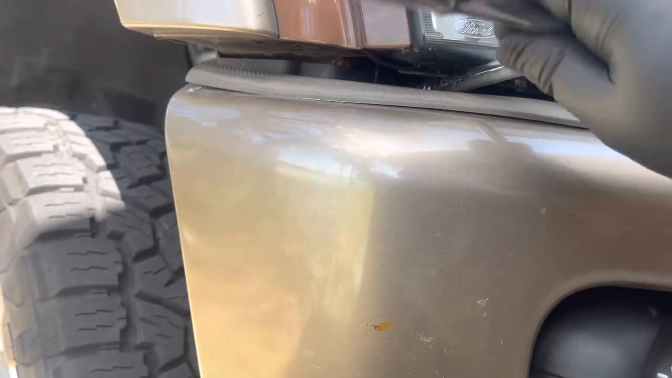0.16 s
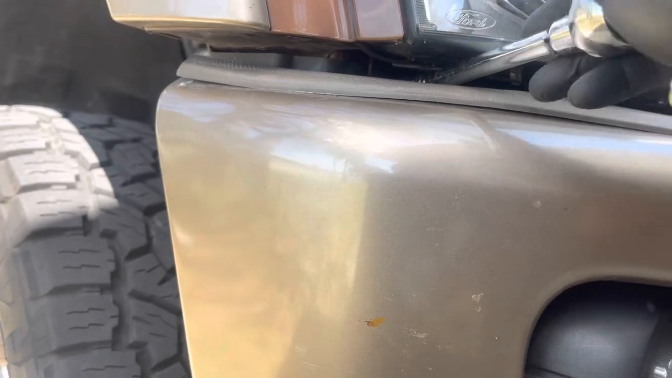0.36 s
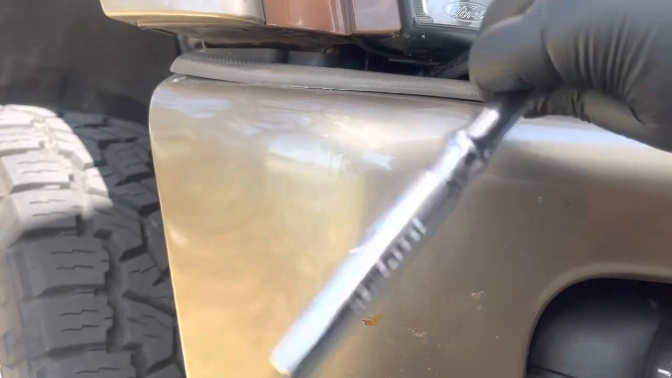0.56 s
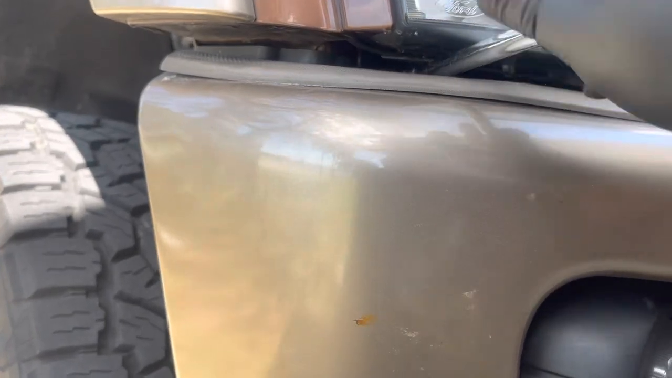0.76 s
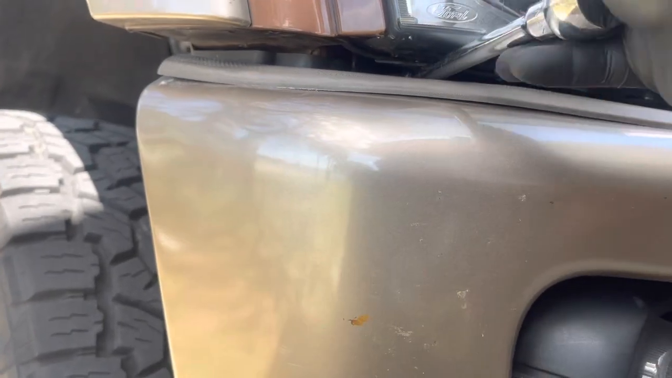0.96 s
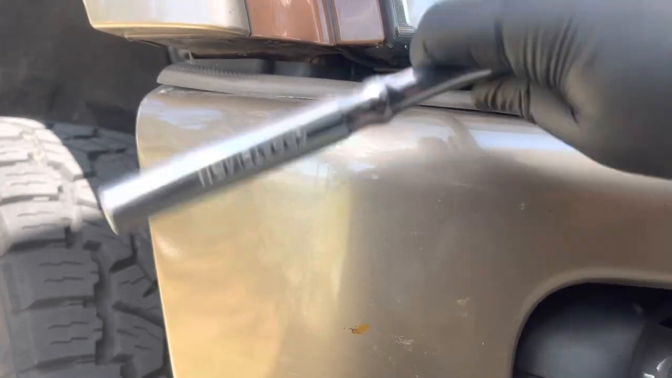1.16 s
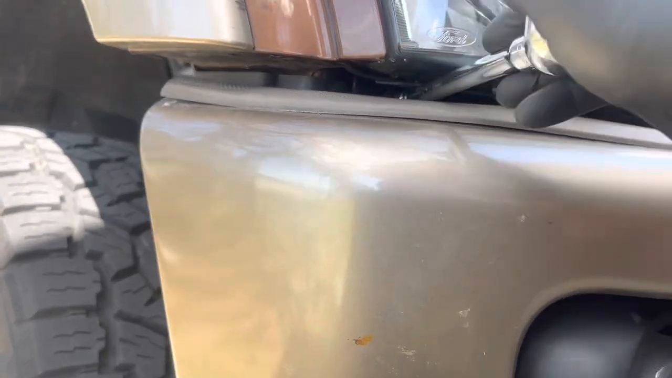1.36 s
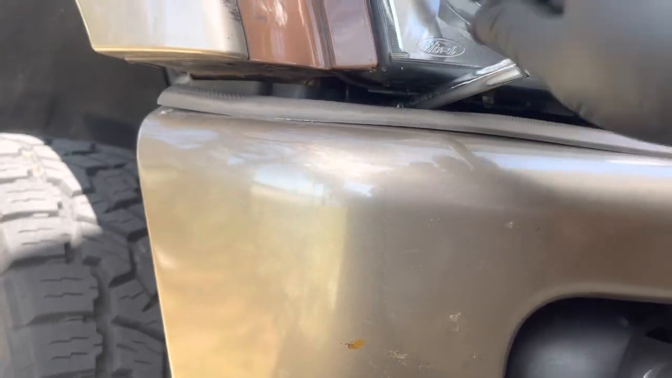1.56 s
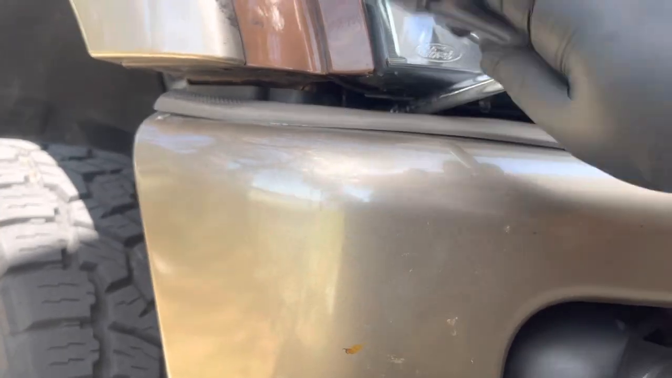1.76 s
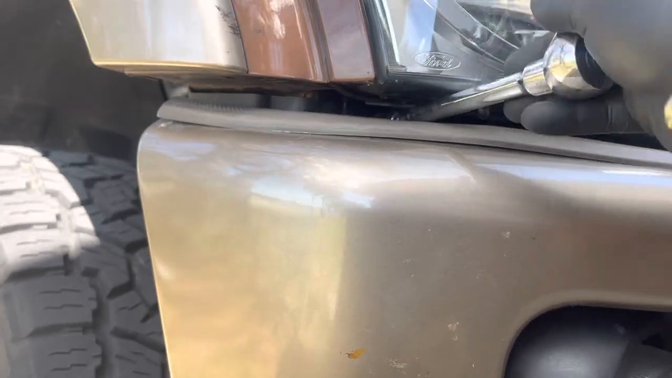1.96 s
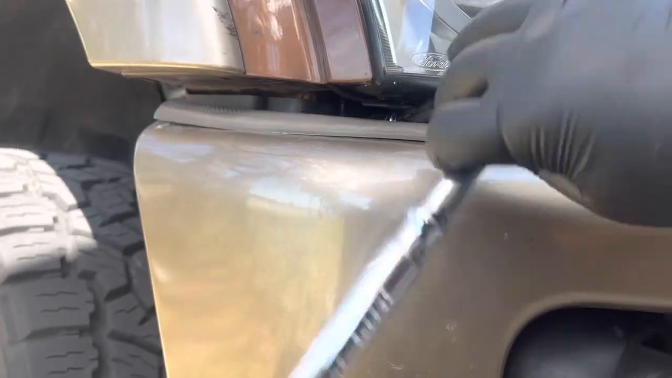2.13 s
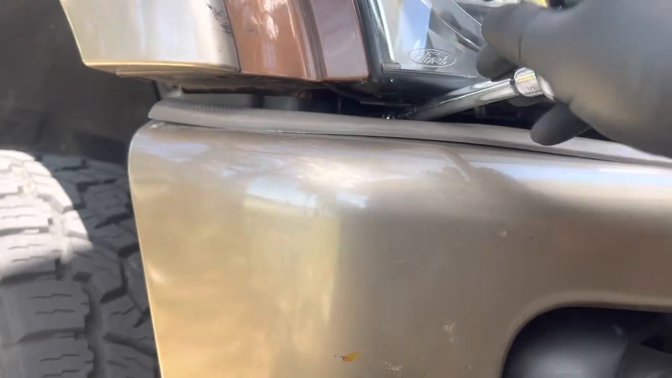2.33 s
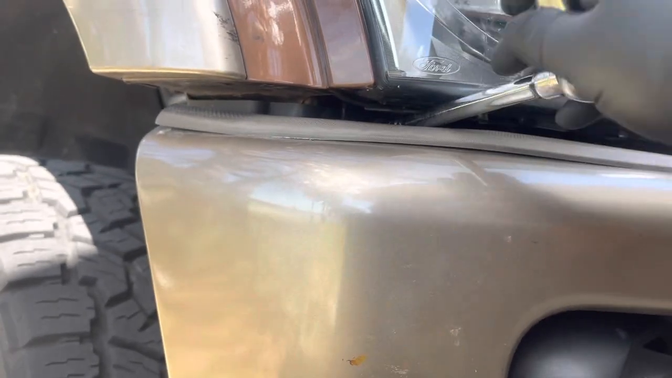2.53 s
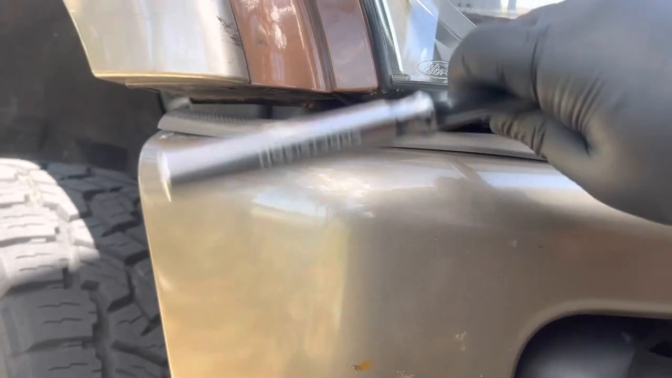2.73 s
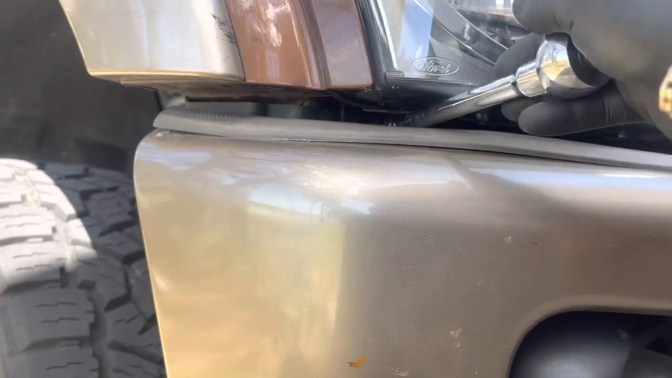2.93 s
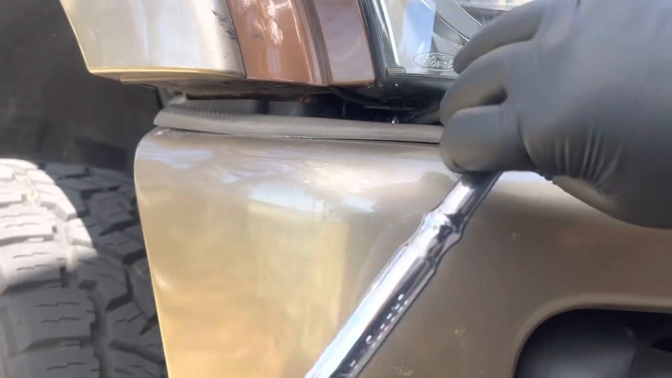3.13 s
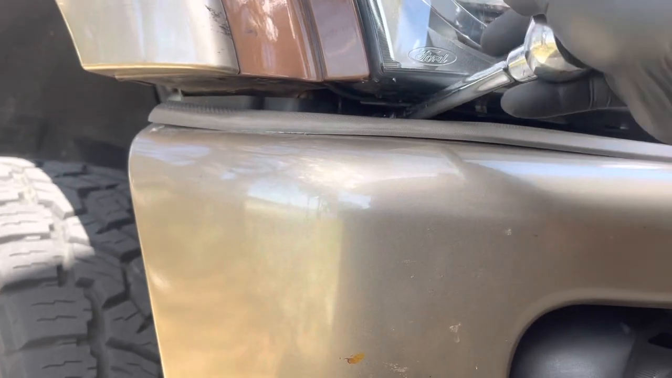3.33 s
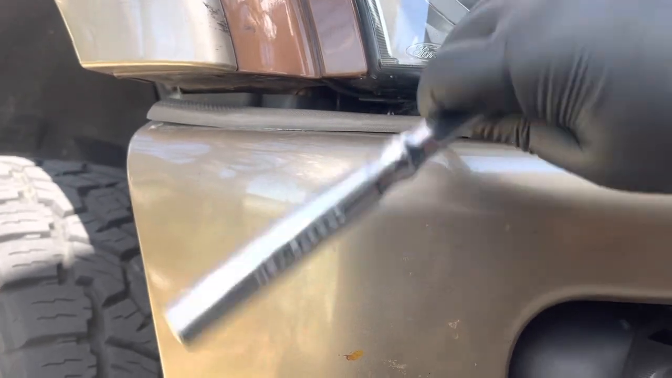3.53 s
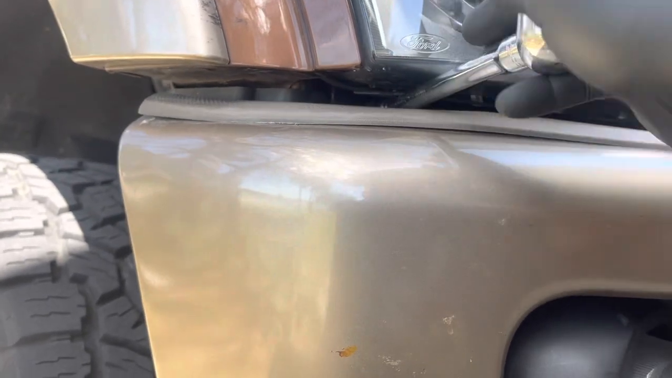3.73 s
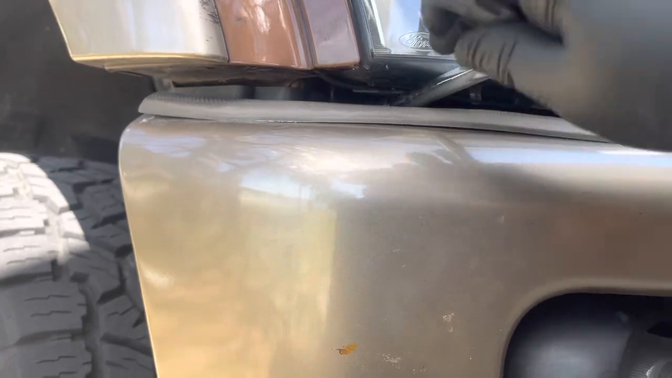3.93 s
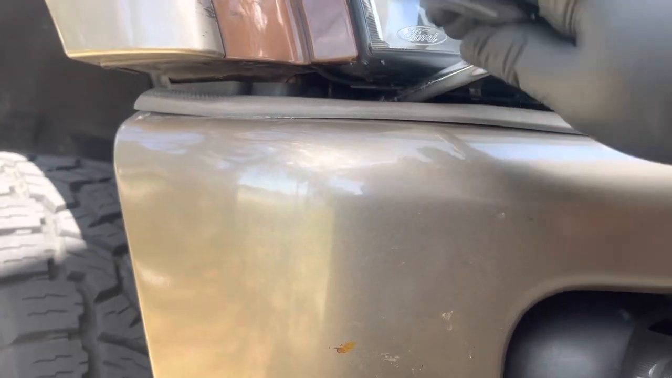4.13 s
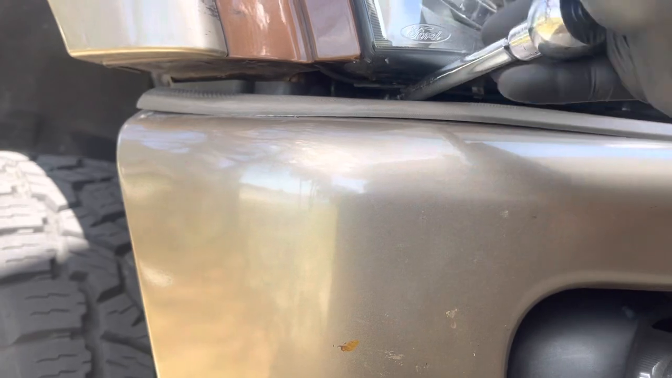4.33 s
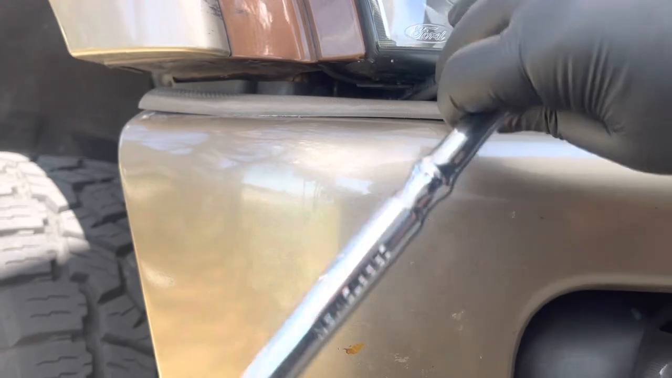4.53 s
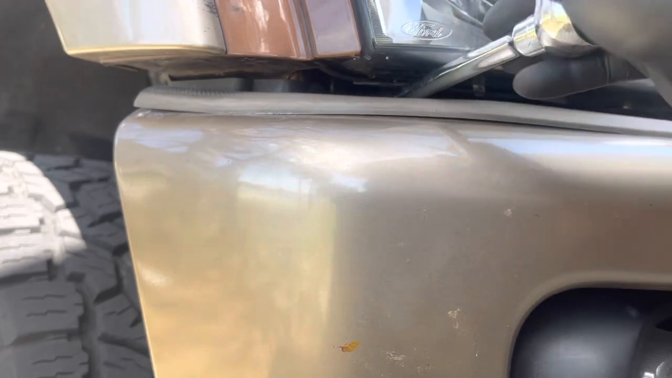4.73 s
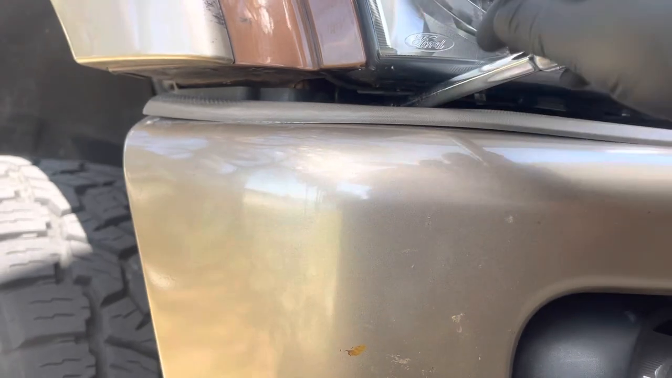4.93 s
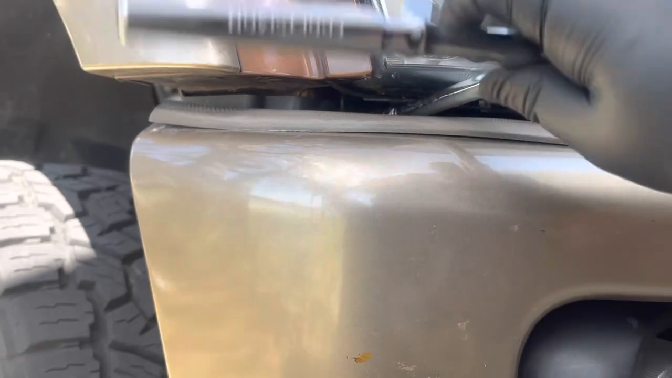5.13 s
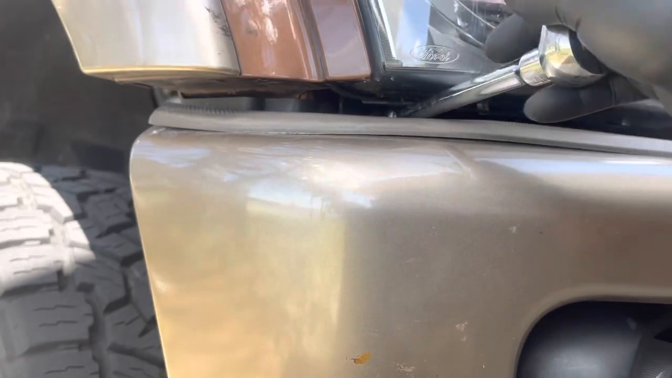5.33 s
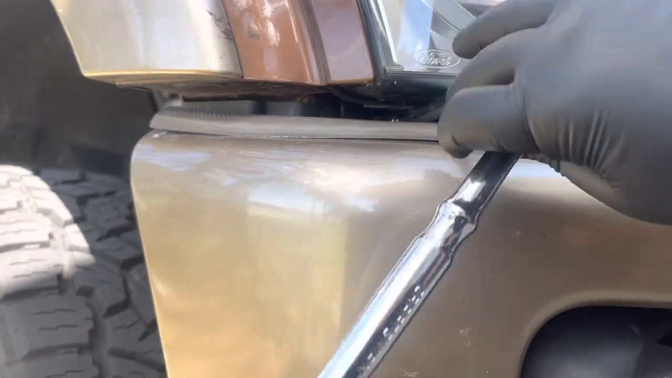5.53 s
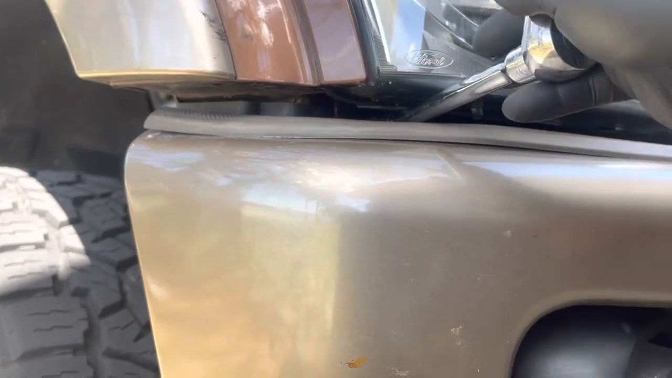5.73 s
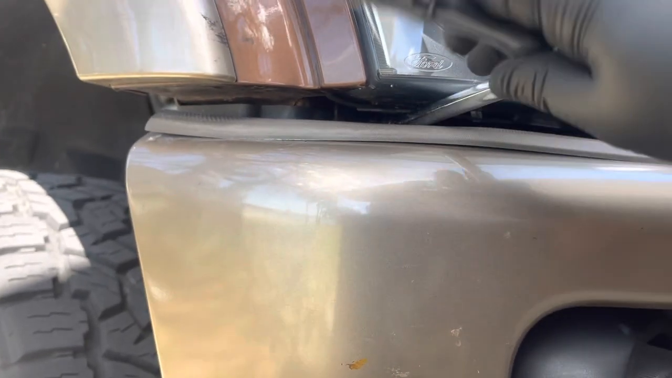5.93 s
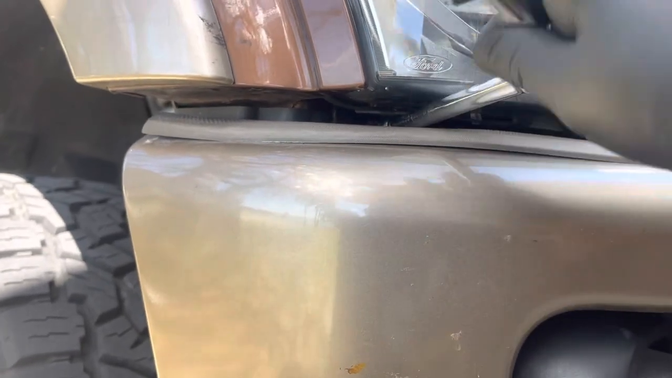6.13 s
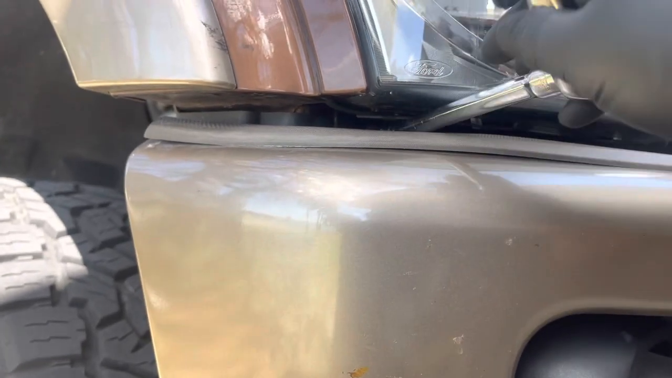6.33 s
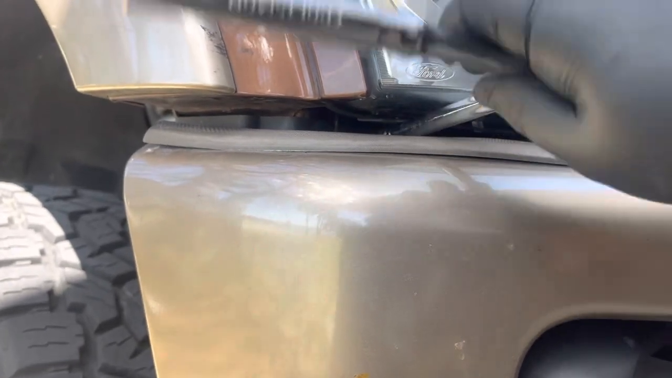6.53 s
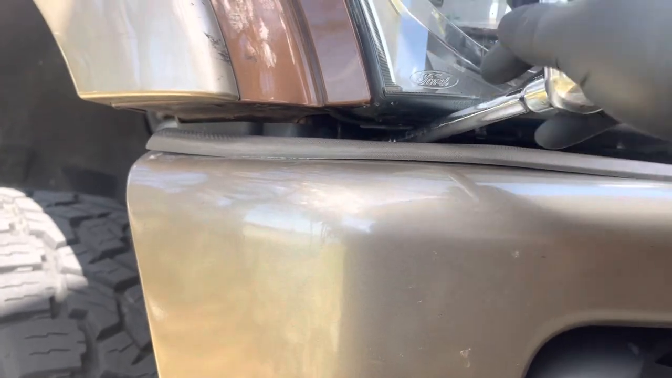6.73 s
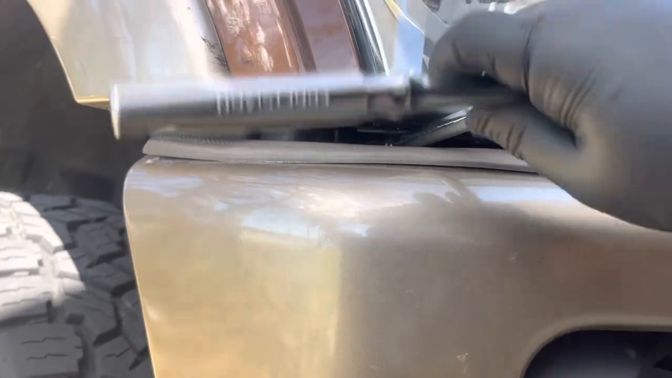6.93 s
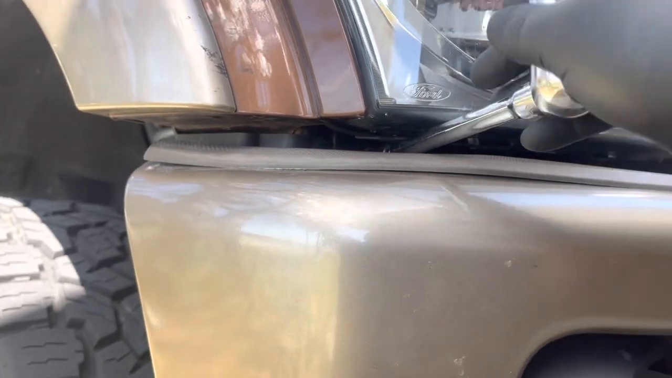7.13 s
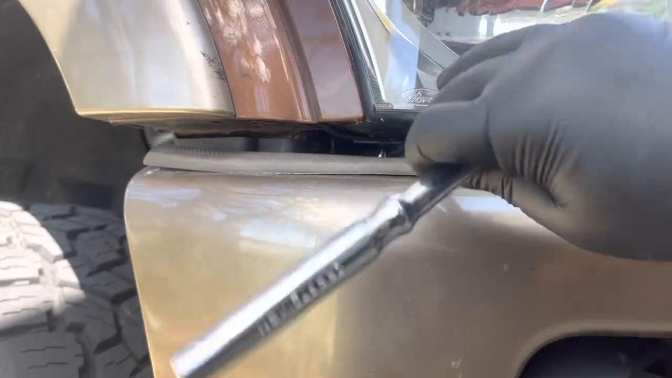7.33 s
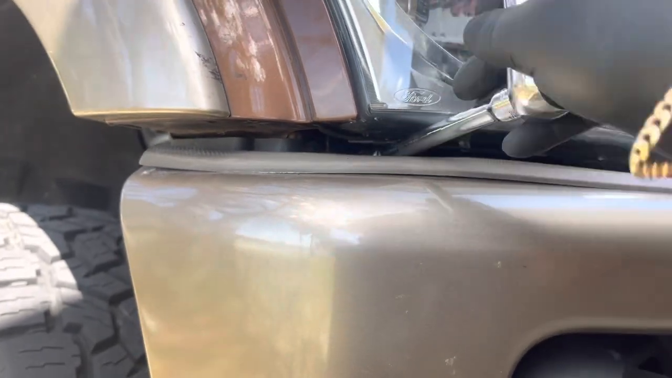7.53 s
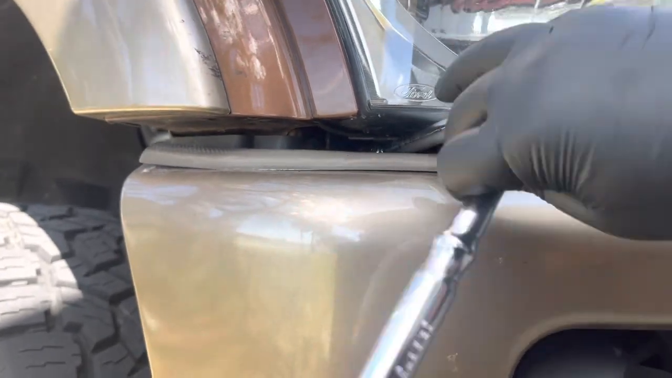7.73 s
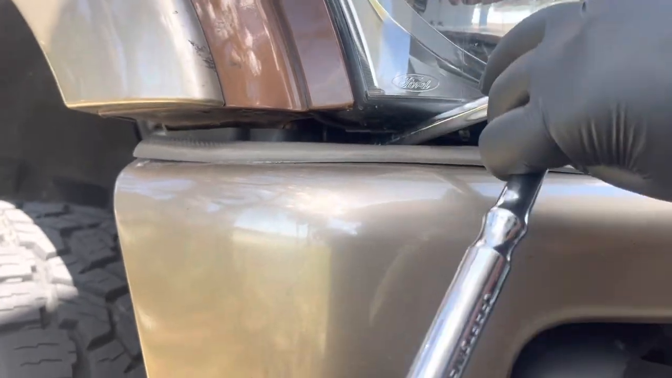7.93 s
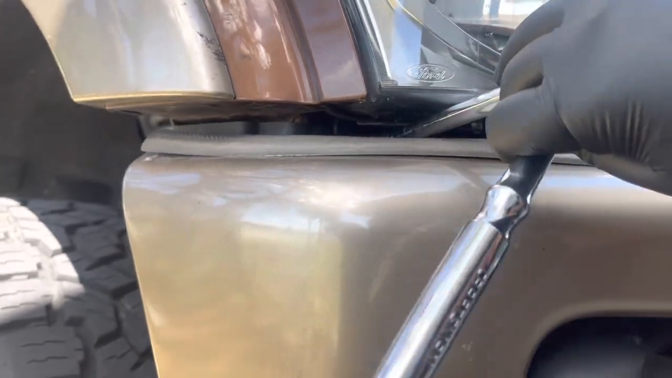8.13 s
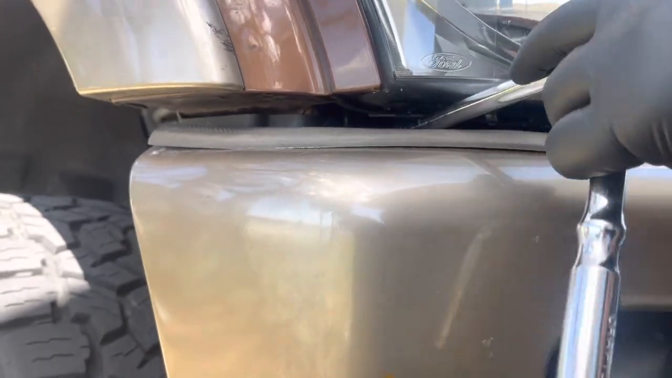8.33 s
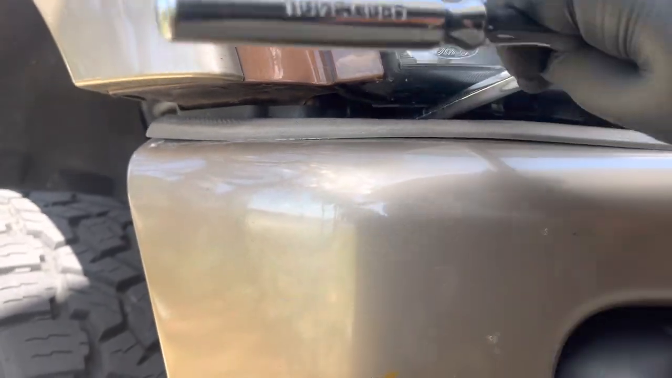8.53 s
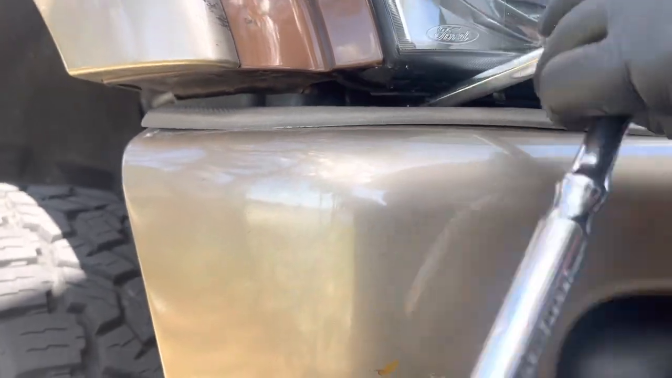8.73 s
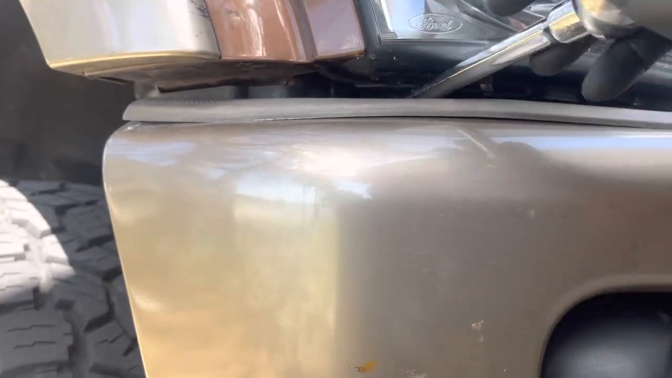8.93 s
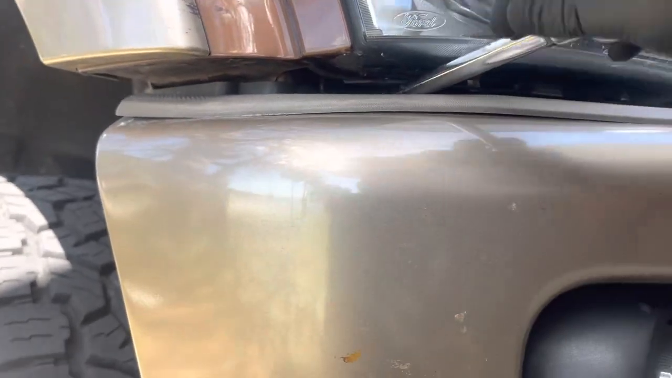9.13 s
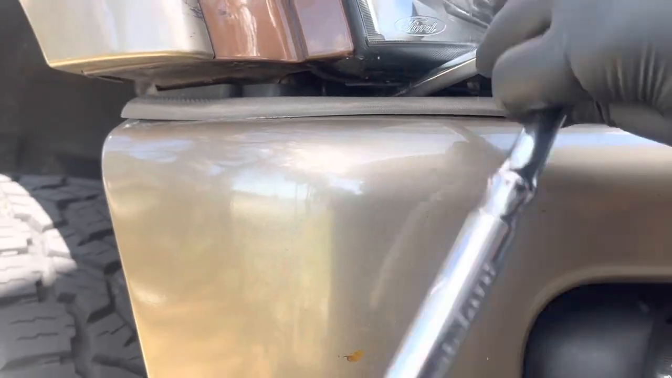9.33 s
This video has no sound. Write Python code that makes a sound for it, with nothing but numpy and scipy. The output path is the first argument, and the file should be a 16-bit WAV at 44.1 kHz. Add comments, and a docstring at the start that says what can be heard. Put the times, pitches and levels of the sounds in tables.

```python
"""Outdoors, close beside a vehicle: a socket ratchet on a long extension backs a bolt out of the bodywork.
Behind it lie shaped-noise air and a deep noise sway. Load knocks and small jolts ring the body panel modes,
with filtered noise for clatter and scuff; a low heave rings as each back-swing sets off.
Slack in the joints ticks, and on each back-swing the pawl trips over the gear teeth: noise bursts
ring the head resonances and the extension bar clanks with them."""
import sys
import numpy as np
from scipy import signal
from scipy.fft import rfft, irfft
from scipy.io import wavfile
from scipy.ndimage import uniform_filter1d

SR = 44100
rng = np.random.default_rng(int(sys.argv[2]) if len(sys.argv) > 2 else 0)


def dump_mix(stems):
    """Bounce the given channels to the path in sys.argv[1] as a 16-bit WAV at rate SR."""
    frames = np.atleast_2d(stems).T  # one column per channel
    limited = np.clip(frames, -1, 1)  # hard clip at full scale
    pcm = np.round(limited * 32767).astype(np.int16)
    wavfile.write(sys.argv[1], SR, pcm)


N = 413216


def amp(db):
    """Gain of a level in dB."""
    return 10 ** (np.asarray(db) / 20)


def rms_one(x):
    """Signal scaled to rms 1."""
    return x / np.sqrt(np.mean(x ** 2) + 1e-20)


def train(rows, gains):
    """One impulse at the time of each row, over a vanishingly small constant."""
    out = np.full(N, 1e-18)
    samples = (np.array(rows)[:, 0] * SR).astype(int)
    out[samples.clip(0, N - 1)] = gains
    return out


def fade(x, t60):
    """Every impulse starts an exponential decay, 60 dB down after t60 seconds."""
    return signal.lfilter([1], [1, -amp(-60 / (t60 * SR))], x)


def band(x, low_hz, high_hz):
    """Butterworth band-pass."""
    return signal.sosfilt(signal.butter(2, [low_hz, high_hz], "band", fs=SR, output="sos"), x)


def resonance(x, hz, width_hz):
    """Two-pole resonance with gain 1 at its peak."""
    r = np.exp(-np.pi * width_hz / SR)
    poles = [1, -2 * r * np.cos(2 * np.pi * hz / SR), r * r]
    return signal.lfilter([(1 - r * r) / 2, 0, (r * r - 1) / 2], poles, x)


def ring(clicks, hz, t60):
    """A unit click sets a decaying sine of starting height 1 ringing."""
    r, w = amp(-60 / (t60 * SR)), 2 * np.pi * hz / SR
    return signal.lfilter([0, np.sin(w)], [1, -2 * r * np.cos(w), r * r], clicks)


def shaped(x, points, power=1):
    """Spectrum weighted by a (Hz, dB) table, interpolated over log frequency."""
    hz, db = np.transpose(points)
    grid = np.log(np.fft.rfftfreq(N, 1 / SR) + 1)
    return irfft(rfft(x) * amp(power * np.interp(grid, np.log(hz), db)), N)


# spectrum of the outdoor floor: pitch_hz [Hz], density_db [dB per Hz, relative]
AIR_SPECTRUM = [(30, -18), (80, -4), (330, -6), (630, -22.5), (1280, -26), (6900, -43), (9000, -33.5),
                (11000, -65)]
AIR_DB = -48


def outdoor_air():
    """Steady noise with the floor's spectrum: one signal for the middle, one for the sides."""
    noise = rng.standard_normal((2, N))
    return amp(AIR_DB) * rms_one(shaped(noise, AIR_SPECTRUM))


# hands working the tool: time_s [s], rumble_db [dB, panel rumble], sway_db [dB, deep sway]
HAND_WORK = [(0, -36, -38), (1.15, -35.5, -50), (1.7, -34, -37.5), (4.1, -35, -39.5), (5.2, -34.5, -44),
             (7.0, -32, -41), (7.65, -34, -38.5), (8.0, -42.5, -53), (8.599, -39, -38.5), (9.101, -41, -49),
             (9.37, -34, -39)]


def work_levels():
    """Panel rumble and deep sway levels in dB, gliding from point to point as the hands work."""
    time_s, rumble_db, sway_db = np.transpose(HAND_WORK)
    t = np.arange(N) / SR
    return np.interp(t, time_s, rumble_db), np.interp(t, time_s, sway_db)


def deep_sway(sway_db):
    """Low noise swells and sinks with the hands' work."""
    return amp(sway_db) * rms_one(band(rng.standard_normal(N), 44, 123.4))


HEAVE_HZ, HEAVE_DB, HEAVE_T60_S = 74, -28.5, 0.27


def body_heave(swings):
    """The body rocks as each back-swing sets off: a low mode that takes a moment to swell."""
    levels_db = HEAVE_DB + 3.0 * rng.standard_normal(len(swings))
    shoves = train([swing[0] for swing in swings], amp(levels_db))
    return ring(shoves, HEAVE_HZ, HEAVE_T60_S) - ring(shoves, HEAVE_HZ, 0.028)


# load knocks into the bodywork: start_s [s], level_db [dB, relative],
# hardness_db [dB, relative: high panel modes over low ones]
LOAD_KNOCKS = [(0.117, -20.5, 2), (0.298, -19, -4.5), (0.386, -18.5, -3), (0.404, -17, 14),
               (0.596, -22.5, 1), (1.239, -22.5, 5), (1.389, -13.5, -7), (1.539, -11.5, 5),
               (1.736, -14.5, 3.5), (1.947, -28, 10), (2.007, -16, 3), (2.201, -21, 0), (2.285, -21, 1),
               (2.382, -22.5, -7), (2.445, -23.5, -3), (2.516, -18.5, 4), (2.699, -20, 5.5),
               (2.773, -19.5, 2), (2.87, -13.5, -8.5), (2.969, -14.5, 9.5), (3.165, -22.5, 1),
               (3.233, -26.5, 10), (3.385, -19.5, 4.5), (3.674, -15.5, -12.5), (3.771, -14.5, -8),
               (3.896, -23.5, 8), (4.056, -15.5, 9), (4.077, -13.5, -3), (4.228, -23.5, 3), (4.34, -18, -2),
               (4.388, -16, 3), (4.682, -15.5, -8), (4.727, -16.5, 12), (4.899, -15, -1), (5.076, -25, -11),
               (5.14, -16, -5), (5.383, -18, 2), (5.572, -19, 0.5), (5.816, -22.5, -5), (5.851, -20.5, 11),
               (6.121, -13, -8), (6.219, -7, -3), (6.488, -26, 1), (6.544, -22, 6.5), (6.648, -18, -13),
               (6.761, -15, -1), (7.049, -25, 10), (7.111, -23, 10), (7.31, -21, 1), (7.407, -17, 1),
               (7.503, -24, -13), (7.608, -24.5, -1), (7.789, -13.5, 6), (8.175, -28, 4), (8.466, -34, -18),
               (8.563, -27, 2), (8.672, -27.5, 5), (9.038, -24.5, 8), (9.32, -18.5, 2)]
# body panel modes: pitch_hz [Hz], level_db [dB, relative], t60_s [s, for knocks]
PANEL_MODES = [(105, -26, 0.1), (167.3, -9, 0.13), (208.7, -16, 0.3), (255.4, -9, 0.2), (282.6, -6.5, 0.15),
               (343.4, -5, 0.081), (407.4, -10.5, 0.19), (475.7, -9.5, 0.13), (531.8, -6.5, 0.11),
               (602, -20, 0.029), (720, -29, 0.24), (790, -16.5, 0.08), (1129, -16, 0.072)]
JOLTS_PER_S = 400   # before the loudness follows the movement


def bodywork(rumble_db, drops):
    """Knocks and a patter of small jolts strike the same panel modes; hard knocks favour the high ones."""
    start_s, level_db, hardness_db = np.transpose(LOAD_KNOCKS)
    luck = rng.standard_normal((len(start_s), len(PANEL_MODES)))
    share = amp(2.7 * luck)
    weight = amp(np.array(PANEL_MODES)[:, 1]) ** 2
    # the random sharing among modes keeps each knock's weighted power
    share /= np.sqrt(share ** 2 @ weight / weight.sum())[:, None]

    # jolts swell while something moves: each pawl drop or tick keeps them up for a moment
    movements = .7 * train(drops, 1) + .7 * train(JOINT_TICKS, 1)
    moving = amp(-17) + np.tanh(fade(movements, .22))
    jolt_gain = amp(1.6 * np.minimum(rng.exponential(1, N), 4))
    jolts = (rng.random(N) < JOLTS_PER_S / SR) * jolt_gain * moving

    knocks, rumble = np.zeros(N), np.zeros(N)
    for k, (hz, mode_db, t60) in enumerate(PANEL_MODES):
        tilt_db = 0.89 * hardness_db * np.clip(np.log2(hz / 300), -1.6, 1)
        signs = np.sign(luck[:, k - 1])
        blows = train(LOAD_KNOCKS, amp(level_db + mode_db + tilt_db) * share[:, k] * signs)
        knocks += ring(blows, hz, t60) - ring(blows, hz, 0.013)   # the panel takes a moment to swing up
        jolt_hits = jolts * rng.standard_normal(N) + 1e-18
        rumble += amp(mode_db) * ring(jolt_hits, hz, 0.7 * t60)

    # a soft contact dulls the knocks
    knocks = signal.lfilter([1], [1, -.9], 0.12 * knocks)
    # knocks scatter a dull clatter
    scatter = fade(train(LOAD_KNOCKS, amp(level_db + 0.05 * hardness_db)), 0.17)
    clatter = scatter * band(rng.standard_normal(N), 500, 1560)
    # ticks and jolts scuff
    tick_push = train(JOINT_TICKS, np.sqrt(amp(np.array(JOINT_TICKS)[:, 1])))
    rubbing = fade(jolts * moving ** 2 + 60.0 * tick_push, 0.11)
    scuff = rms_one(rubbing * band(rng.standard_normal(N), 550, 1350))
    working = amp(rumble_db) * (rms_one(rumble) + amp(-14) * scuff)
    return knocks + amp(-6) * clatter + working


# slack taken up in socket and joints: start_s [s], level_db [dB, relative],
# clank_db [dB, relative: bar clank over the tick]
JOINT_TICKS = [(0.108, -38, 4), (0.1428, -31, -2), (0.3675, -34, 4), (0.381, -39.5, 14), (0.4034, -46.5, 8),
               (0.6219, -46.5, 10), (0.6354, -49.5, 10), (0.96, -35, 1), (0.972, -45.5, 9),
               (0.9857, -37, -5), (1.0916, -51.5, 2), (1.2276, -50, 19.5), (1.4084, -33, -1),
               (1.447, -40.5, 7), (1.469, -44, -4), (1.501, -44, -4), (1.537, -40, 5), (1.675, -52, 11),
               (1.957, -46.5, -7), (2.0052, -41.5, 6), (2.056, -46.5, -11), (2.0907, -52, 7),
               (2.1249, -46.5, -8), (2.1815, -40.5, 8), (2.4346, -41, -7), (2.4777, -41.5, -10),
               (2.5117, -48, 13), (2.5316, -43.5, -17), (2.6853, -41.5, 9), (2.928, -39, 3.5),
               (2.9697, -37.5, 5), (3.0176, -49, 12.5), (3.1453, -47, 14), (3.1585, -48.5, 7),
               (3.3726, -34, -14), (3.393, -39.5, -6), (3.4917, -44, 3), (3.5984, -42.5, 10),
               (3.7715, -23, -7), (3.7993, -44, 2), (3.815, -39, 6.5), (3.8512, -38, -5),
               (3.8927, -36.5, -9), (3.911, -49.5, -16), (4.0346, -46, -2), (4.0489, -38, 9.5),
               (4.304, -43, 10), (4.332, -26.5, -7), (4.371, -37, -11), (4.3859, -43.5, 7),
               (4.4857, -48, 3), (4.828, -29, -3.5), (4.8715, -42, -3), (4.8954, -38, 5),
               (5.0322, -41.5, 4), (5.063, -44.5, 7), (5.3078, -36, -2), (5.3537, -42.5, -8),
               (5.3802, -50.5, 8), (5.81, -29.5, -5), (5.8523, -40, 5), (5.953, -47.5, 2), (5.975, -49, 10),
               (6.0545, -36.5, 5), (6.267, -40.5, 6), (6.2825, -47, 11), (6.4666, -43, 4.5),
               (6.6914, -31, -2), (6.7268, -45.5, 7), (6.7586, -43, 4), (6.7981, -47, 1), (7.064, -32.5, 0),
               (7.0992, -36.5, -3), (7.12, -42, -11), (7.152, -51.5, 5), (7.2079, -51, -3),
               (7.302, -38.5, 7), (7.3366, -36.5, 2), (7.497, -31, -1), (7.536, -38, -10), (7.768, -51, 9),
               (7.786, -45.5, 2), (7.7924, -36.5, -15), (8.173, -51, -3), (8.2126, -47.5, 5.5),
               (8.3259, -44, -4), (8.3472, -53, 9), (8.5376, -43, -6), (8.5554, -44.5, 5), (8.6891, -37, 3),
               (8.6991, -32, -5), (9.0225, -35.5, -4), (9.0378, -38, 3.5), (9.2, -53, 14), (9.234, -43, 1),
               (9.269, -39.5, 4), (9.2955, -45, 6.5), (9.3146, -47, 7)]
SLACK_LEAD_S, SLACK_DB, SLACK_CLANK_DB = .08, -58, 14   # time spread, loudest level, relative clank


def slack(swings):
    """Play in the joints ticks as listed, plus three faint ticks before each back-swing as the hand turns."""
    starts = np.repeat([swing[0, 0] for swing in swings], repeats=3)
    luck = rng.random((len(starts), 2))
    faint_s = starts - .015 - SLACK_LEAD_S * luck[:, 0]
    faint_db = SLACK_DB - 8 * luck[:, 1]
    faint = np.c_[faint_s, faint_db, np.full(len(starts), SLACK_CLANK_DB)]
    return np.vstack([JOINT_TICKS, faint])


# back-swings: first_tooth_s [s], last_tooth_s [s], braking [share of a cruising gap], last_gap_ms [ms],
# then level_db [dB, relative] of each tooth in turn
BACK_SWINGS = [(0.1541, 0.3092, 1.7, 24.4, -27, -27, -21, -21, -21, -20, -21, -21, -24, -28, -30),
               (0.6548, 0.9158, 1.31, 24.9, -29, -31, -30, -31, -23, -21, -21, -17, -17, -21, -18, -21, -17, -18, -20, -19, -28, -27, -24, -22),
               (1.2552, 1.3828, 0.73, 8.8, -24, -21, -25, -24, -22, -21, -20, -23, -21, -21, -17, -17, -18, -20, -29),
               (1.7282, 1.9114, 1.06, 27.3, -24, -29, -27, -28, -28, -25, -21, -22, -21, -19, -18, -19, -18, -22, -23, -31, -22),
               (2.209, 2.4075, 0.76, 27.2, -23, -25, -23, -24, -23, -26, -18, -16, -18, -22, -20, -23, -23, -21, -19, -21, -17, -20, -23, -25, -23),
               (2.7113, 2.8896, 1.35, 27.8, -21, -21, -24, -25, -24, -23, -23, -31, -24, -23, -26, -23, -23, -19, -16, -20, -24, -28),
               (3.1765, 3.3173, 0.5, 14.6, -23, -24, -21, -23, -13, -16, -17, -23, -23, -21, -19, -19, -19, -19, -16, -20, -23),
               (3.6126, 3.7657, 0.66, 17.4, -24, -23, -19, -27, -25, -19, -22, -21, -22, -22, -22, -18, -20, -22, -23, -27),
               (4.0817, 4.2662, 1.28, 14.2, -20, -21, -18, -23, -22, -23, -27, -23, -26, -24, -23, -17, -19, -19, -21, -25, -35),
               (4.5993, 4.7526, 0.65, 11.6, -21, -19, -17, -18, -21, -26, -24, -24, -20, -20, -19, -19, -19, -16, -16, -20, -26, -26),
               (5.0989, 5.279, 1.17, 28.2, -22, -20, -25, -23, -20, -25, -24, -26, -27, -25, -24, -21, -15, -20, -23, -26),
               (5.5739, 5.7531, 0.8, 16.6, -25, -24, -21, -23, -23, -19, -22, -23, -23, -21, -22, -20, -25, -21, -19, -20, -25, -24),
               (6.0653, 6.2147, 0.62, 16.2, -19, -19, -15, -18, -26, -20, -22, -23, -27, -25, -23, -23, -17, -16, -21, -16),
               (6.5012, 6.6495, 1.36, 23.0, -28, -20, -22, -22, -24, -22, -28, -22, -18, -21, -20, -20, -15, -18, -27, -25),
               (6.9109, 7.0518, 0.82, 18.9, -27, -23, -25, -24, -21, -18, -20, -19, -21, -22, -20, -21, -22, -26, -31),
               (7.3568, 7.4906, 1.28, 20.6, -21, -23, -23, -28, -25, -20, -25, -24, -24, -19, -19, -18, -26),
               (8.3932, 8.4818, 0.74, 21.3, -32, -30, -29, -27, -28, -29),
               (8.7453, 8.9766, 0.38, 21.2, -26, -28, -29, -25, -24, -22, -18, -20, -21, -20, -21, -22, -23, -23, -27, -27, -27),
               (9.3339, 9.3591, 0, 12.4, -22, -22, -27)]
# extra gap at the start (share), teeth it lasts, how late braking bites (exponent)
LAUNCH, LAUNCH_TEETH, BRAKE_POWER = .5, 3.17, 2.4
TOOTH_SPREAD_MS = .25   # random timing, standard deviation


def pawl_drops():
    """The hand speeds up, cruises and brakes; the pawl drops once a tooth: rows (s, dB) for each swing."""
    swings = []
    for first_s, last_s, braking, last_ms, *db in BACK_SWINGS:
        k = np.arange(len(db) - 2)
        launch = LAUNCH * np.exp(-k / LAUNCH_TEETH)
        gaps = 1 + launch + braking * (k / (len(db) - 1)) ** BRAKE_POWER
        gaps *= (last_s - last_ms / 1000 - first_s) / gaps.sum()   # now in seconds
        tooth_s = np.append(first_s + np.cumsum([0, *gaps]), last_s)
        tooth_s = tooth_s + TOOTH_SPREAD_MS / 1000 * rng.standard_normal(len(tooth_s))
        swings.append(np.c_[tooth_s, db])
    return swings


# ratchet head resonances: pitch_hz [Hz], width_hz [Hz], level_db [dB, relative]
HEAD_MODES = [(2740, 570, -15), (3700, 210, -19.5), (4580, 130, -5.5), (5310, 550, -18.5), (6370, 540, -12),
              (8556, 160, 3), (8835, 120, 2), (11060, 465, -1.5), (11400, 630, -12), (15700, 1500, -29)]
SEAT_DETUNE = 0.018   # the head's pitch shifts with how the pawl seats: standard deviation, share of pitch
GLINT_LOW_HZ, GLINT_HIGH_HZ, GLINT_WIDTH_HZ, GLINT_DB = 2600, 7500, 160, -10


def steel_clicks(rows, body_db, broad_db, chatter_s, tail_db, tail_s, spread_db):
    """Each contact is a short chatter of noise with a dying rattle; it sets every head resonance ringing anew."""
    count = len(rows)
    t = np.arange(3000) / SR
    rise = np.clip(t / chatter_s, 0, 1)
    blow = np.sin(np.pi * rise ** .85)
    # the rattle comes in uneven lumps about 1.4 ms long
    lumps = np.repeat(rng.gamma(3, 1 / 3, (count, 1, 50)), repeats=60, axis=2)
    rattle = lumps * amp(tail_db - 60 * t / tail_s) * rise
    noise = (blow + rattle) * rng.standard_normal((count, 2, len(t)))   # middle and side

    # colour changes from click to click and drifts over about eight clicks
    chance = rng.standard_normal((count, 2, len(HEAD_MODES), 1, 1))
    drift = uniform_filter1d(chance[:, 1], size=8, axis=0)
    luck = amp(spread_db * (chance[:, 0] + 1.8 * drift))
    click = amp(broad_db + spread_db * chance[:, 1, 0]) * band(noise, 3100, 11000)
    for k, (hz, width_hz, mode_db) in enumerate(HEAD_MODES):
        for seat in range(6):   # six seatings take turns
            part = slice(seat, None, 6)
            seat_hz = hz * (1 + SEAT_DETUNE * rng.standard_normal())
            click[part] += luck[part, k] * amp(mode_db) * resonance(noise[part], seat_hz, width_hz)

    # brief metallic rings vary the colour: two random pitches a click, from twenty pairs in turn
    glint_hz = GLINT_LOW_HZ * (GLINT_HIGH_HZ / GLINT_LOW_HZ) ** rng.random(40)
    for group, hz in enumerate(glint_hz):
        part = slice(group % 20, None, 20)
        click[part] += amp(GLINT_DB) * resonance(noise[part], hz, GLINT_WIDTH_HZ)
    # however it is shared among the resonances, the blow's onset has rms 1 in the middle
    click /= np.sqrt(np.mean(click[:, :1, :200] ** 2, axis=2, keepdims=True))

    # the extension bar answers with a duller, longer clank
    clank = amp(-60 * t / 0.046) * rise * rng.standard_normal(noise.shape)
    bar = band(clank, 670, 2610) + 1.88 * resonance(clank, 1117, 180)
    click += amp(body_db + 8.5).reshape(-1, 1, 1) * bar

    out = np.zeros((2, N + len(t)))
    for (start_s, db), one in zip(rows, click):
        start = int(start_s * SR)
        out[:, start:start + len(t)] += amp(db) * one
    return out[:, :N]


# level balance by pitch: pitch_hz [Hz], balance_db [dB, left minus right]
PORT_BALANCE = [(80, -1.5), (150, -4), (700, -1), (1300, 1), (8000, 0.8)]
PORT_LAG_S = 1.5e-5


def ports(mid, side):
    """Two close microphone ports: the right one hears the middle slightly later; balance varies by pitch."""
    lag = np.exp(-2j * np.pi * np.fft.rfftfreq(N, 1 / SR) * PORT_LAG_S)
    late = irfft(rfft(mid) * lag, N)
    left = shaped(mid + side, PORT_BALANCE, .5)
    right = shaped(late - side, PORT_BALANCE, -.5)
    return np.array([left, right])


def scene():
    """Outdoor air, deep sway, body panels, joint ticks and ratchet, heard at two ports."""
    swings = pawl_drops()
    drops = np.vstack(swings)
    rumble_db, sway_db = work_levels()
    air, air_side = outdoor_air()
    sway = deep_sway(sway_db)
    heave = body_heave(swings)
    panels = bodywork(rumble_db, drops)
    play = slack(swings)
    ticks = steel_clicks(play[:, :2], play[:, 2], broad_db=-6, chatter_s=0.0038,
                         tail_db=-13.5, tail_s=0.12, spread_db=7.0)
    pawl = steel_clicks(drops, body_db=-9, broad_db=-15.5, chatter_s=0.0036,
                        tail_db=-9, tail_s=0.08, spread_db=4.0)
    steel_mid, steel_side = pawl + ticks
    mid = steel_mid + panels + sway + heave + air
    # the panels' middle range widens the image 160 samples (3.6 ms) late
    panel_side = np.roll(band(panels, 490, 3000), 160)
    side = amp(-8) * steel_side + amp(-2.0) * band(air_side, 300, 11000) + amp(-9.0) * panel_side
    return ports(mid, side)


# microphone port cancellations: pitch_hz [Hz], width_hz [Hz]
PORT_DIPS = [(10200, 730), (14000, 4900), (14300, 1800)]
CUTOFF_HZ = 17100


def record(dry):
    """Port cancellations dip the treble; filters cut the deepest bass and the top."""
    for hz, width_hz in PORT_DIPS:
        dry = dry - .75 * resonance(dry, hz, width_hz)
    dry = signal.sosfilt(signal.butter(3, 42, "high", fs=SR, output="sos"), dry)
    return signal.sosfilt(signal.cheby2(12, 70, CUTOFF_HZ, fs=SR, output="sos"), dry)


dry = scene()
out = record(dry)
dump_mix(out)
```